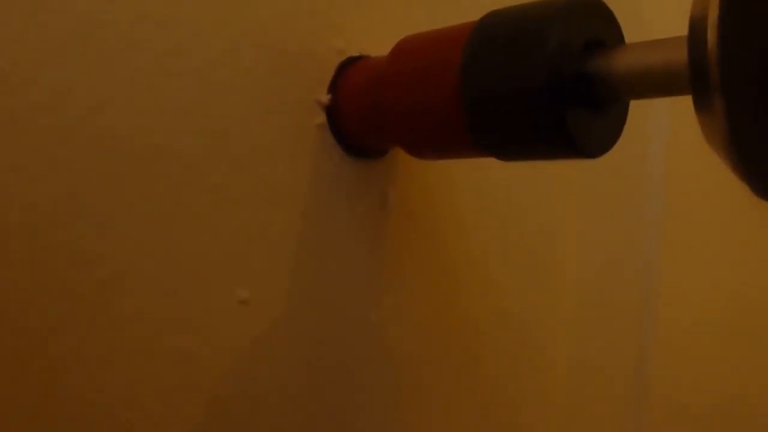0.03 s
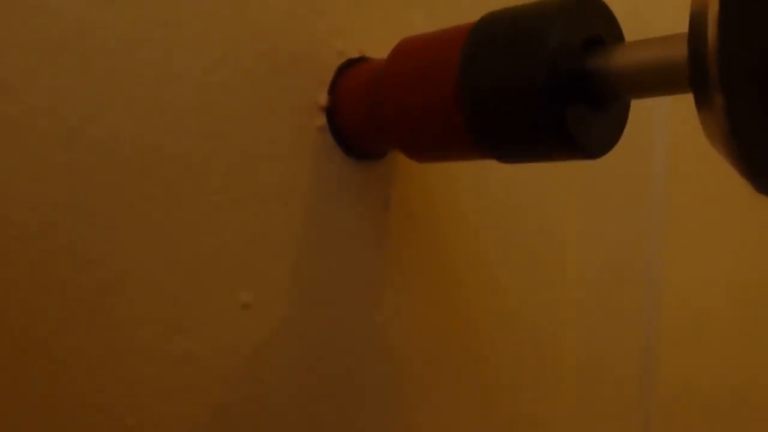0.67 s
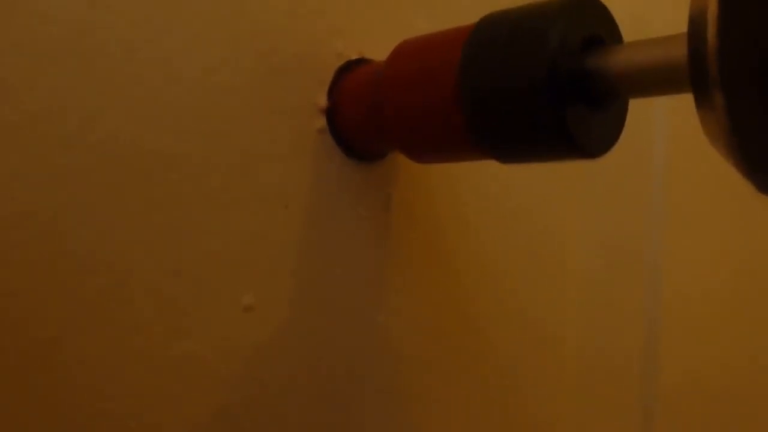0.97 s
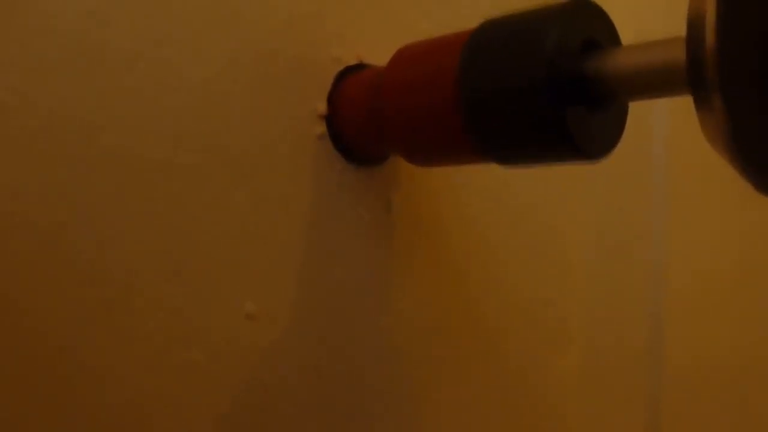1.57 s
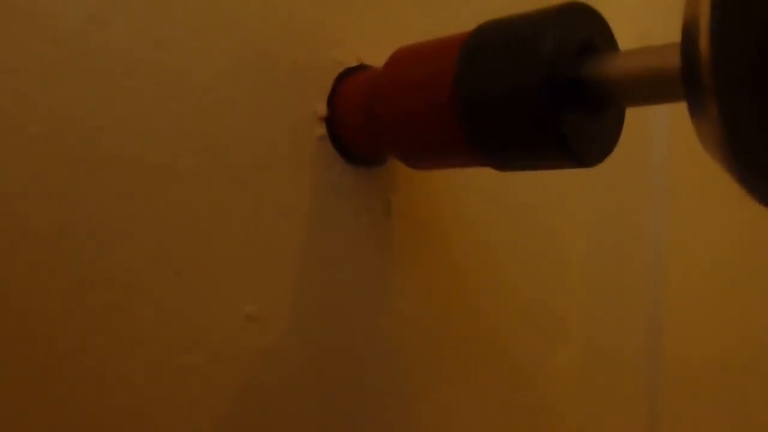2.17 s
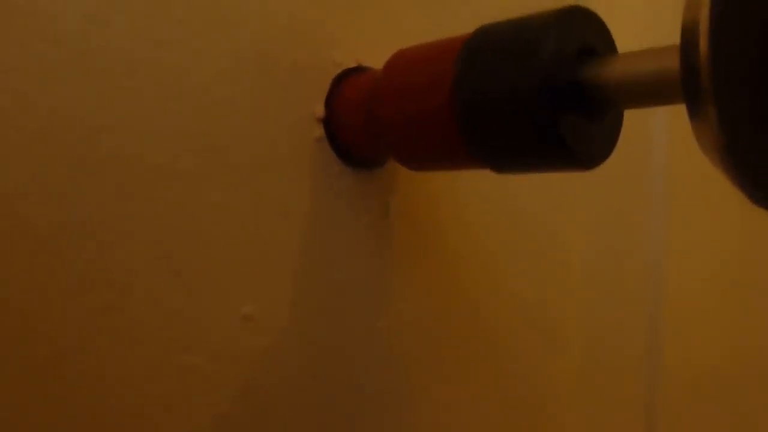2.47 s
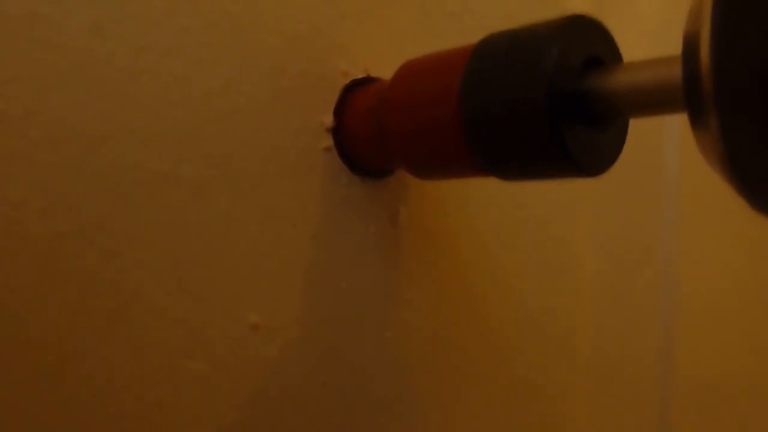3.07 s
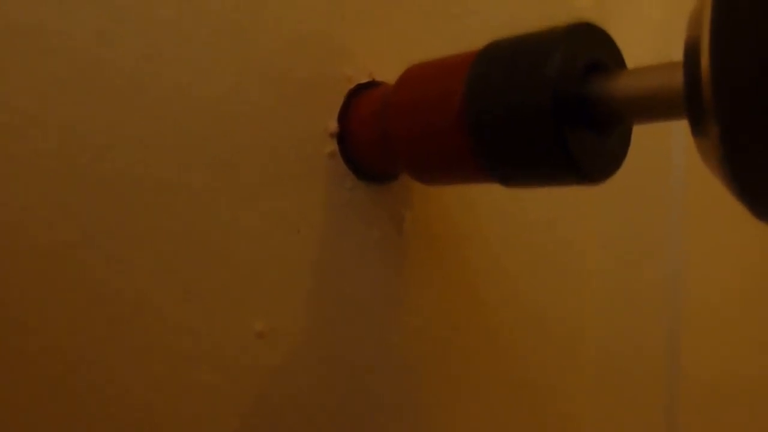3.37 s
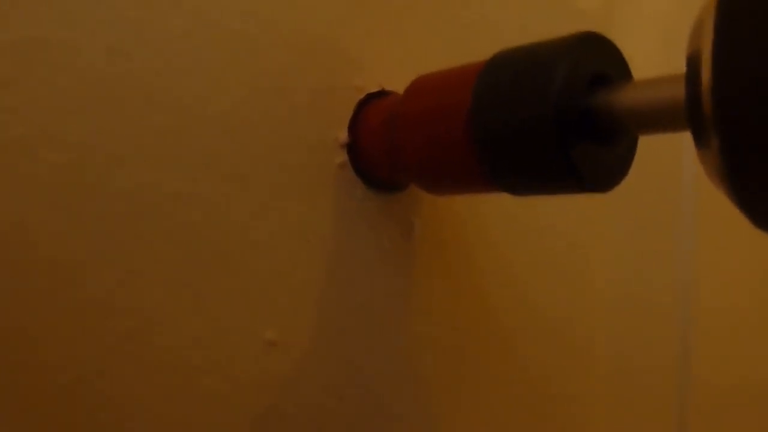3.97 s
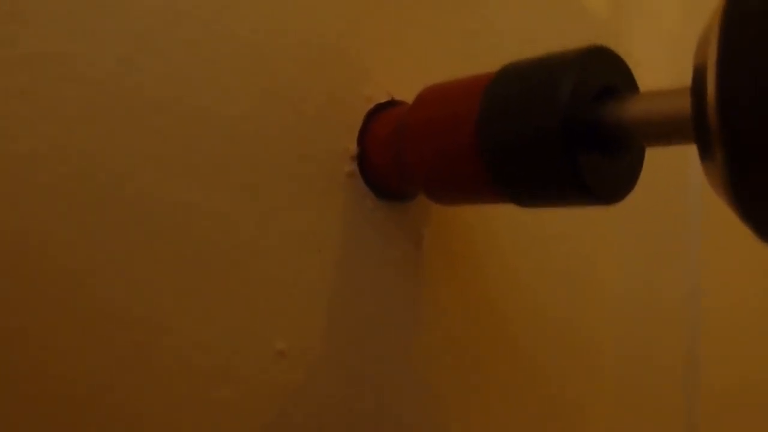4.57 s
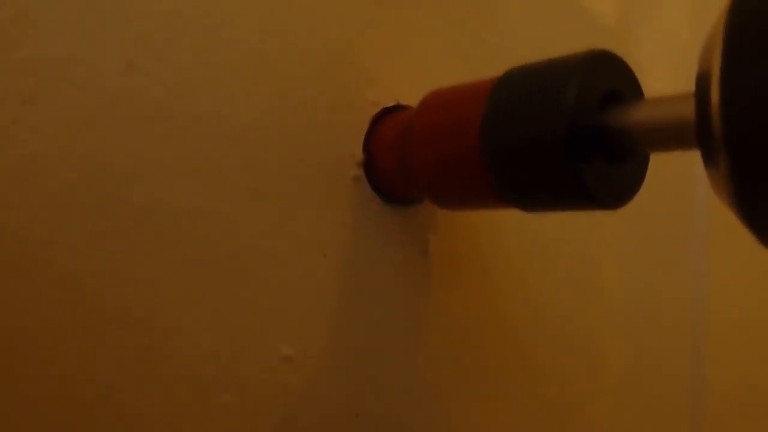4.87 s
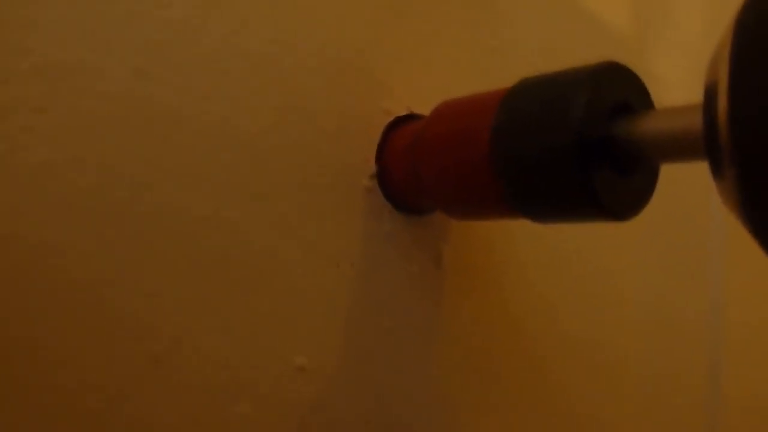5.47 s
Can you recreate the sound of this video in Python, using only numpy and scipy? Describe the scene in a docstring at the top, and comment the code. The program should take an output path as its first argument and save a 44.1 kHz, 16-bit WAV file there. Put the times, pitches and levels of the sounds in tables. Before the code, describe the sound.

Close indoors, a drill whines constantly while its hole saw scrapes through a metal door, squeaking more often near the end.

```python
"""Indoors, heard close and in mono, a power drill drives a hole saw into a metal door.
Periodic tooth forces make the gears whine, modulated by each turn of the spindle, over the motor's
harmonics. Friction of the saw teeth rasps and forces the door to scrape, sing and drone. As the saw
bites deeper the drill slows a little. The teeth snag, now and then at first and about once a turn
near the end, and each catch chirps in the sheet by the dispersion of bending waves."""
import sys
import numpy as np
from scipy import signal
from scipy.fft import rfft, irfft, next_fast_len
from scipy.io import wavfile
from scipy.ndimage import map_coordinates

SR = 44100
rng = np.random.default_rng(int(sys.argv[2]) if len(sys.argv) > 2 else 0)


def pcm_store(signal):
    """Save signal as 16-bit PCM."""
    levels = np.round(np.clip(np.atleast_2d(signal), -1, 1) * 32767)
    wavfile.write(sys.argv[1], SR, levels.astype(np.int16).T)


N = 252113
TIME = np.arange(N) / SR

# drill speed: (time [s], gear mesh rate [Hz])
MESH_RATE = [(0.0, 667.4), (0.75, 664.9), (1.3, 666.0), (1.8, 661.3), (2.45, 662.7), (3.3, 657.2),
             (3.7, 657.8), (4.27, 653.7), (4.6, 655.2), (5.0, 649.0), (5.25, 651.2), (5.6, 638.8),
             (5.72, 618.9)]
# uneven running of the spindle: (rate [cycles/turn], mesh phase lead [rad], greatest lead at [turns])
SPINDLE_RIPPLE = [(1, .133, .525), (2, .077, .393), (3, .198, .286), (4, .054, .092)]
# lower mesh harmonics: (multiple, relative tone level [dB], relative rattle level [dB],
#   change over the cut [dB], once-a-turn swell [dB], loudest at [turns], planet gear throb [dB],
#   hardest at [turns], housing resonance [Hz], bandwidth [Hz])
LOW_MESH_HARMONICS = [(1, -19, -40, 10, -0.5, 0.61, -0.5, .2, 655, 330),
                      (3, 0.56, -18, -3, 2, 0.94, 2.5, 0.13, 1990, 260),
                      (4, -3.5, -16.5, 4.5, 3.5, .87, 4.5, 0.14, 2712, 42)]
# upper mesh harmonics: columns as above
HIGH_MESH_HARMONICS = [(5, 0.5, -5.5, 0.5, 3.9, 0.78, 3.3, 0.094, 3300, 550),
                       (6, -8, -4, -4.5, 1.5, 0.62, 1, 0.32, 4005, 60),
                       (7, 0.6, -9, -5.5, 3.3, .03, 1.8, .21, 4675, 200),
                       (8, -7, -9.5, 3, 1, 0.51, 1.5, 0.29, 5375, 77),
                       (9, -13.5, -14, 3, 0.7, .41, .5, .05, 6030, 80)]
# harmonics of the rotor: (multiple, level [dB])
ROTOR_HARMONICS = [(1, -51.5), (3, -44.5), (4, -55), (6, -42), (9, -48), (10, -70.5), (12, -59),
                   (14, -62.5), (18, -57)]
# spectrum of the rasping teeth: (frequency [Hz], relative level [dB])
RASP_SPECTRUM = [(900, -34), (1500, -16), (2100, -1), (2450, -7.5), (3000, -3.5), (3600, -2.5), (3900, 0),
                 (4250, -5.5), (4650, 1.5), (5000, 1.9), (5350, -1.5), (5550, -9), (6000, -6),
                 (6600, -14.5), (7400, -30)]
# spectrum of the scrape in the groove: (frequency [Hz], relative level [dB])
SCRAPE_SPECTRUM = [(300, -23), (520, -5.5), (700, 5), (900, 1), (1030, 0.5), (1120, 3.5), (1220, 1.5),
                   (1400, 5), (1610, 4), (1740, 4.5), (1850, 1.5), (2400, -4.5), (3500, -5.5), (6000, -47)]
# narrow band in which the sheet sings: (frequency [Hz], relative level [dB])
SING_SPECTRUM = [(600, -40), (900, -23), (1220, -6.5), (1360, 3), (1470, -5), (1700, -35.5)]
# low response of the door: (frequency [Hz], relative level [dB])
DRONE_SPECTRUM = [(25, -50), (50, -37), (78, -24.5), (95, -6.5), (125, -5.5), (145, -6.5), (210, 0),
                  (240, -2.5), (330, 4.5), (420, -1.5), (550, -1), (900, -14.5), (2000, -38.5)]
# spindle harmonics passing door resonances: (multiple, peak level [dB], peak time [s], half width [s])
HUM_HARMONICS = [(6, -60.5, 2.9, 1.8), (7, -57, 3.8, 1), (8, -51, 5.16, 0.76), (11, -56.5, 2.13, 0.99),
                 (13, -46.5, 5.36, 0.077), (14, -55.5, 3.8, 3.2), (16, -53.5, 4.3, 0.29),
                 (22, -58, 4.8, 0.8), (24, -53.5, 3.5, 0.86), (46, -54, 3, 0.67), (48, -51.5, 3.5, .6),
                 (188, -53, 3.5, .7)]
# harder bites of the saw: (time [s], half length [s], lift of the drone [dB])
SAW_BITES = [(0.152, 0.63, 2), (3.65, 0.16, 2.5), (4.213, 0.15, 3), (4.785, 0.46, 2), (5.503, 0.18, 6.5)]
# snags of the saw: (time of last hard catch [s], relative level [dB], build-up [s], pitch [ratio])
SAW_SNAGS = [(0.146, -29.5, 0.0091, 1.2), (0.213, -27, 0.01, .97), (0.276, -28.5, 0.0073, 0.97),
             (0.589, -37, 0.01, 1.04), (0.653, -30.5, 0.009, 0.95), (0.778, -31.5, 0.0039, 1),
             (0.841, -31.5, 0.012, 0.71), (1.797, -39, 0.0048, 1.05), (1.926, -33, 0.0042, 1.06),
             (2.054, -32.5, 0.002, 0.84), (2.306, -29.5, .007, 0.91), (2.562, -29, 0.0042, 0.95),
             (4.138, -28.5, 0.0062, 0.95), (4.242, -31.5, 0.0048, 0.9), (4.333, -29.5, 0.012, 0.9),
             (4.399, -25, .012, 0.94), (4.416, -28, 0.011, 0.94), (4.461, -29, 0.0077, 0.94),
             (4.476, -28.5, 0.003, 1.1), (4.522, -33.5, 0.0086, 0.88), (4.594, -30, 0.011, 1.1),
             (4.609, -27, 0.0046, 0.96), (4.656, -25.5, 0.011, 1.08), (4.716, -24, 0.0078, 0.97),
             (4.79, -26.5, 0.013, 1.01), (4.868, -32, 0.0088, 1.1), (4.921, -21, 0.014, 0.97),
             (4.984, -28, 0.022, 0.9), (5.051, -23, 0.0097, 0.99), (5.101, -31.5, 0.0024, 1.4),
             (5.116, -23, 0.0072, 1.01), (5.181, -26.5, 0.013, 1.01), (5.246, -23, 0.0062, 0.973),
             (5.311, -28, 0.0067, 1), (5.374, -30, 0.0083, 1.06), (5.443, -30, 0.013, 1),
             (5.462, -26.5, .006, 1.05), (5.531, -29.5, 0.0046, 1.04), (5.562, -30.5, 0.0057, 1.3),
             (5.627, -26.5, 0.013, 0.98), (5.68, -34.5, 0.0024, 1.27)]
# response of the sheet round the cut: (frequency [Hz], gain [dB])
SHEET_RESPONSE = [(1000, -10.5), (1300, -6.5), (1420, -1), (1520, -4), (1610, -8.5), (1750, 5), (1830, -1),
                  (1940, 4), (2250, -2), (3300, 8), (4500, -23)]
# overall colour, dull on top with a gap at 8 kHz: (frequency [Hz], gain [dB])
RECORDING_COLOUR = [(25, -10.5), (50, -7), (70, -0.5), (7400, 0), (7800, -18), (8000, -45.5), (8250, -19.5),
                    (8700, -6.5), (10000, -10.5), (10500, -34.5)]

MESH_PER_TURN, MESH_PER_MOTOR_TURN, SAW_TEETH, PLANETS = 42, 2.0755, 12, 3
FREE_HZ, LOADED_HZ, LABOUR_HZ = 667, 648, 639  # mesh rates: no load, full load, onset of labouring
LABOUR_DB_PER_HZ = 1  # the whine fades as the mesh rate drops below LABOUR_HZ
# (value running free, change at full load)
WANDER_HZ = (0.2, 0.6)
LOW_WHINE_DB, HIGH_WHINE_DB = (-32, -1.5), (-34.5, -2)
RASP_DB, SCRAPE_DB, DRONE_DB = (-26.5, -3.5), (-35.5, 2), (-46, 2.5)


def undb(db):
    """Amplitude ratio of a level in decibels."""
    return 10 ** (np.asarray(db) / 20)


def unit(x):
    """Normalisation to an rms of 1."""
    return x / np.sqrt(np.mean(np.abs(x) ** 2))


def colour(x, points):
    """Linear filtering by a response of (frequency [Hz], gain [dB]) points."""
    size = next_fast_len(N + 8192)
    hz, db = np.transpose(points)
    bin_hz = np.maximum(np.arange(size // 2 + 1) * SR / size, 1)
    gain = undb(np.interp(np.log(bin_hz), np.log(hz), db))
    return irfft(rfft(x, size) * gain, size)[:N]


def walk(rate):
    """Random modulation of rms 1, interpolated between `rate` values a second."""
    steps = rng.standard_normal(8192)
    return unit(np.interp(TIME * rate, np.arange(len(steps)), steps))


def loaded(setting, load):
    """Linear dependence on the load, from 0 (free) to 1 (full)."""
    free, change = setting
    return free + change * load


def swell(x, centre, width, lift_db):
    """Gaussian rise and fall of level, in dB, over load or time."""
    return lift_db * np.exp(-((x - centre) / width) ** 2)


def runout(turns, reach, count=14, size=512):
    """Gear run-out modulates level and phase periodically, weakly beyond `reach` cycles a turn."""
    cycles = np.r_[-count:0, 1:count + 1]
    weights = np.exp(2j * np.pi * rng.random(len(cycles))) / (1 + (cycles / reach) ** 2)
    position = np.linspace(0, 1, size)
    one_turn = np.exp(2j * np.pi * np.outer(position, cycles)) @ weights
    return unit(np.interp(turns % 1, position, one_turn))


def gear_whine(turns, load, harmonics, reach, rough, uneven_db):
    """Mesh harmonics, modulated in phase and amplitude by the rotation, drive housing resonances."""
    def cycle(per_turn, peak_at):
        return np.cos(2 * np.pi * per_turn * (turns - peak_at))

    out, depth = 0, turns / turns[-1]
    ripple = sum(lead * cycle(per_turn, peak_at) for per_turn, lead, peak_at in SPINDLE_RIPPLE)
    mesh_angle = 2 * np.pi * MESH_PER_TURN * turns + ripple
    lurch_db = uneven_db * (0.5 + 0.5 * load) * walk(28)
    for k, tone_db, rattle_db, change_db, swell_db, loudest, throb_db, hardest, hz, width in harmonics:
        periodic_db = swell_db * cycle(1, loudest) + throb_db * cycle(PLANETS, hardest)
        swing = undb(change_db * depth + periodic_db + lurch_db)
        contact = 1 + rough * (walk(130) + 1j * walk(130))  # no two teeth meet alike
        force = swing * contact * np.exp(1j * round(k) * mesh_angle)
        # the run-out pattern shifts as the saw sinks
        wobble = np.sqrt(1 - depth) * runout(turns, reach) + np.sqrt(depth) * runout(turns, reach)
        housing = signal.iirpeak(hz, hz / width, fs=SR)
        tone = undb(tone_db) * signal.lfilter(*housing, force.real)
        rattle = undb(rattle_db) * np.real(force * wobble)
        out = out + tone + rattle
    return np.sqrt(2) * out


def motor(turns, flutter_db, slip_rad):
    """Periodic rotation radiates harmonics of the rotor rate, wavering in level and phase."""
    angle = 2 * np.pi * turns * MESH_PER_TURN / MESH_PER_MOTOR_TURN + slip_rad * walk(8.5)
    partials = (undb(db + flutter_db * walk(8.2)) * np.sin(round(k) * angle) for k, db in ROTOR_HARMONICS)
    return np.sqrt(2) * sum(partials)


def groove(turns, size=2048):
    """Roughness of a circular groove is a periodic excitation: the same bumps return every turn."""
    bumps = irfft(np.exp(2j * np.pi * rng.random(size // 2 + 1)))
    return unit(map_coordinates(bumps, [turns % 1 * size], order=3, mode="grid-wrap"))


def tooth_rasp(turns, grain_db, flicker_db, mesh_depth, groove_share, sway_db):
    """Metal-on-metal friction noise, amplitude-modulated by the gear mesh and by each turn."""
    steady_turns = np.linspace(0, turns[-1], N)
    grains = unit(rng.standard_normal(N) * undb(grain_db * rng.standard_normal(N)))
    pulsing = 1 + mesh_depth * np.cos(2 * np.pi * MESH_PER_TURN * steady_turns)
    sway = undb(flicker_db * walk(160) + sway_db * unit(runout(steady_turns, reach=1.1).real))
    friction = grains + groove_share * groove(steady_turns)
    at_mean_speed = colour(friction * pulsing * sway, RASP_SPECTRUM)
    position = turns / turns[-1] * (N - 1)  # the spectrum sinks with the speed
    return unit(map_coordinates(at_mean_speed, [position], order=5, mode="mirror"))


def door_vibration(turns, spectrum, groove_share, flicker_db):
    """Forced vibration: the door filters the saw's drag, part random and part repeating each turn."""
    drag = rng.standard_normal(N) + groove_share * groove(turns)
    flicker = undb(flicker_db * walk(190))
    return unit(colour(drag * flicker, spectrum))


def door_hum(turns, flutter_db):
    """Resonance: each spindle harmonic peaks and shifts phase at its set time of passing a door mode."""
    out = 0
    for k, db, peak_s, width_s in HUM_HARMONICS:
        response = undb(db + flutter_db * walk(4.8)) / (1 + 1j * (TIME - peak_s) / width_s)
        force = np.exp(2j * np.pi * (round(k) * turns + rng.random()))
        out = out + np.real(response * force)
    return np.sqrt(2) * out


def snag_chirps(mesh_hz, start_hz, end_hz, glide_s, ring_s, scatter_db, early_sharp, graze_db, rub):
    """Dispersion: bending waves bring the highs first, so each catch of a tooth chirps downward."""
    out = np.zeros(N + SR)
    t = np.arange(-SR // 20, SR // 20) / SR
    reference_s = 0.03  # a snag's level is its energy spread over this time
    tooth = np.arange(-5, 2)[:, None]  # 0 is the last hard catch, 1 a graze after it
    sharpening = early_sharp * np.tanh(np.maximum(-tooth, 0))
    rubbing = 1 + rub * walk(550)  # the teeth grip unevenly as they drag
    for time_s, db, build_s, pitch in SAW_SNAGS:
        late, force, detune = rng.standard_normal((3, len(tooth), 1))
        catch_s = (tooth + 0.035 * late) * MESH_PER_TURN / SAW_TEETH / mesh_hz[int(time_s * SR)]
        # successive teeth catch harder and ring lower until the saw breaks free
        build_up = 1 / (1 + (catch_s / build_s) ** 4)
        strength = np.where(tooth > 0, undb(graze_db), build_up) * undb(scatter_db * force)
        tuning = pitch * (1 + sharpening + 0.034 * detune)
        age = np.maximum(t - catch_s + ring_s, 0)
        cycles = end_hz * age + (start_hz - end_hz) * glide_s * (1 - np.exp(-age / glide_s))
        envelope = (age / ring_s) ** 2 * np.exp(-(age / ring_s) ** 2)
        burst = np.sum(strength * envelope * np.sin(2 * np.pi * cycles * tuning), axis=0)
        first = int((time_s + t[0]) * SR)
        burst *= np.take(rubbing, np.arange(first, first + len(t)), mode="wrap")
        out[first:first + len(t)] += undb(db) * np.sqrt(reference_s * SR) * burst / np.linalg.norm(burst)
    return colour(out[:N], SHEET_RESPONSE)


def room(x, t60, wet_db):
    """Reverberation: the diffuse field of a small room decays exponentially."""
    t = TIME[:SR // 2]
    tail = rng.standard_normal(len(t)) * np.exp(-np.log(1000) * t / t60)
    return x + undb(wet_db) * signal.fftconvolve(x, tail / np.linalg.norm(tail))[:N]


def scene():
    """Superposition of sources locked to one spindle angle; the load follows from the drop in speed."""
    speed_hz = np.interp(TIME, *np.transpose(MESH_RATE))
    load = np.clip((FREE_HZ - speed_hz) / (FREE_HZ - LOADED_HZ), 0, 1)
    mesh_hz = speed_hz + loaded(WANDER_HZ, load) * walk(9)
    turns = np.cumsum(mesh_hz) / SR / MESH_PER_TURN

    fade_db = LABOUR_DB_PER_HZ * np.maximum(LABOUR_HZ - speed_hz, 0)
    low_db = loaded(LOW_WHINE_DB, load) - fade_db
    high_db = loaded(HIGH_WHINE_DB, load) - fade_db
    high_db += swell(load, centre=0.47, width=0.1, lift_db=2)  # the whine slides through a resonance
    drill = undb(low_db) * gear_whine(turns, load, LOW_MESH_HARMONICS, reach=7, rough=0.11, uneven_db=1.5)
    high_whine = gear_whine(turns, load, HIGH_MESH_HARMONICS, reach=6, rough=0.1, uneven_db=1.18)
    drill += undb(high_db) * high_whine + motor(turns, flutter_db=0.8, slip_rad=0.19)

    bite_db = sum(swell(TIME, *bite) for bite in SAW_BITES)
    rasp_db = loaded(RASP_DB, load) + 0.069 * bite_db
    scrape_db = loaded(SCRAPE_DB, load) + 0.72 * bite_db
    sing_db = -53.5 + swell(load, centre=0.43, width=0.25, lift_db=14.4)
    drone_db = loaded(DRONE_DB, load) + bite_db
    saw = undb(rasp_db) * tooth_rasp(turns, grain_db=2.5, flicker_db=0.84, mesh_depth=0.45,
                                     groove_share=0.28, sway_db=0.5)
    saw += undb(scrape_db) * door_vibration(turns, SCRAPE_SPECTRUM, groove_share=0.49, flicker_db=2.5)
    saw += undb(sing_db) * door_vibration(turns, SING_SPECTRUM, groove_share=0.97, flicker_db=-0.5)
    saw += undb(drone_db) * door_vibration(turns, DRONE_SPECTRUM, groove_share=0.79, flicker_db=1.5)
    saw += door_hum(turns, flutter_db=2.0)
    chirps = snag_chirps(mesh_hz, start_hz=2435, end_hz=1294, glide_s=0.0019, ring_s=0.002457,
                         scatter_db=2.0, early_sharp=0.11, graze_db=-17, rub=0.15)
    dry = drill + saw + room(chirps, t60=0.28, wet_db=-12.0)
    return np.array([dry, dry])


def record(dry):
    """Band limiting: the sound is dull on top, with a gap at 8 kHz and faint hiss above it."""
    heard = np.array([colour(channel, RECORDING_COLOUR) for channel in dry])
    low_pass = signal.ellip(8, 0.2, 70, 10400, fs=SR, output="sos")
    return signal.sosfilt(low_pass, heard)


dry = scene()
out = record(dry)
pcm_store(out)
```